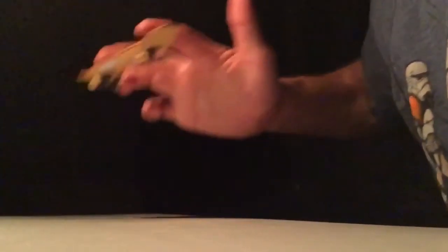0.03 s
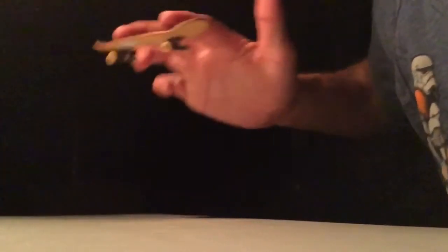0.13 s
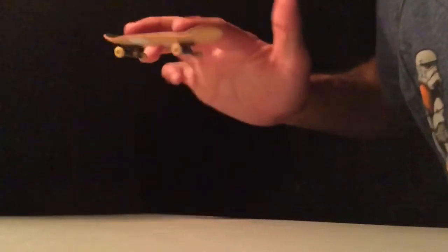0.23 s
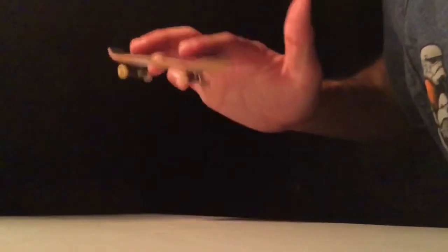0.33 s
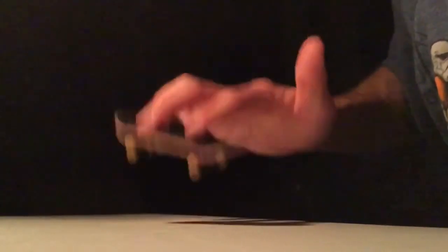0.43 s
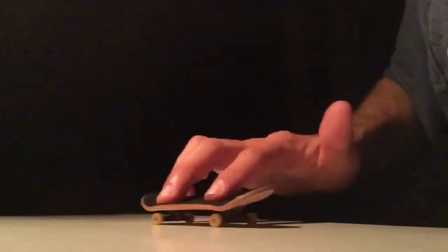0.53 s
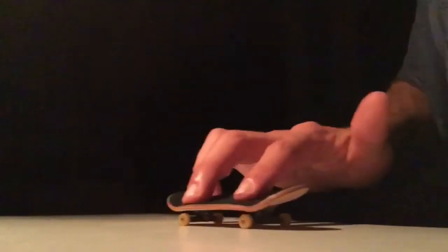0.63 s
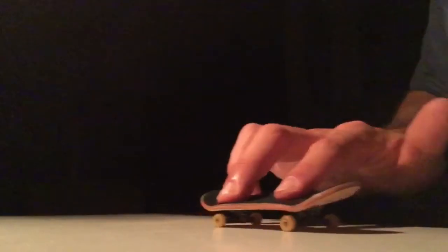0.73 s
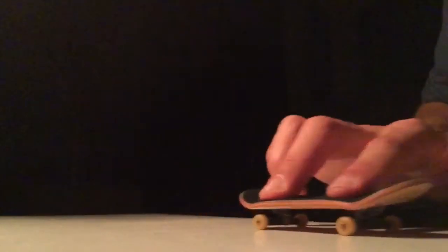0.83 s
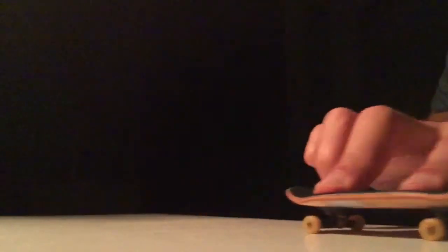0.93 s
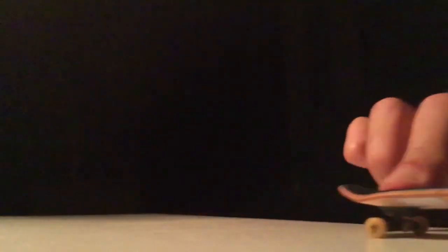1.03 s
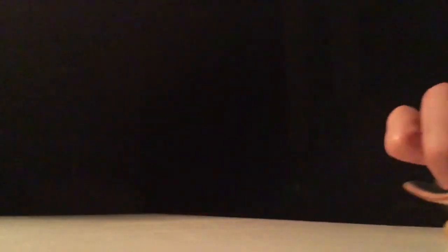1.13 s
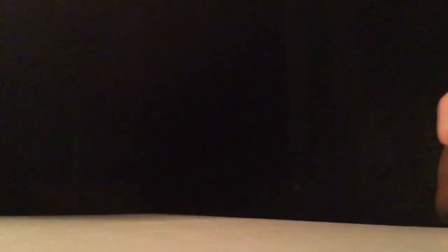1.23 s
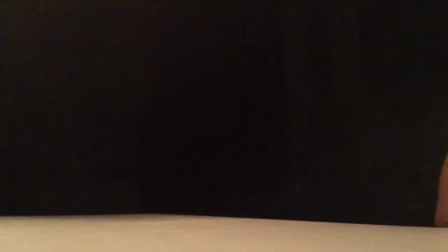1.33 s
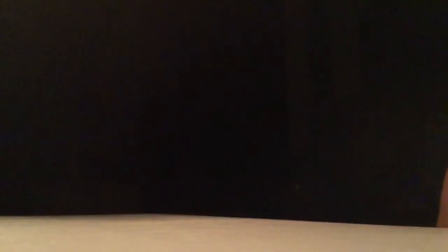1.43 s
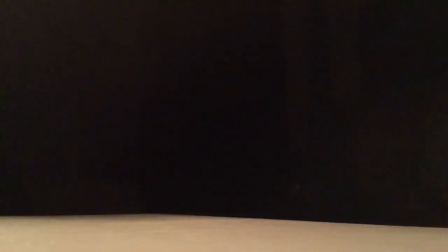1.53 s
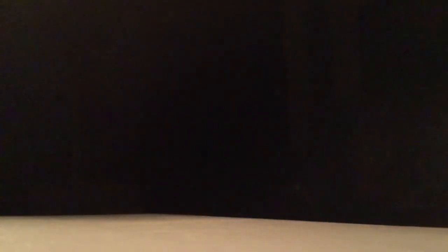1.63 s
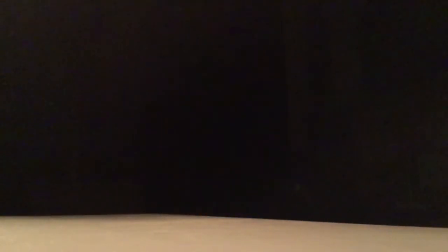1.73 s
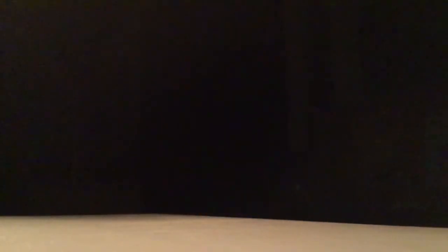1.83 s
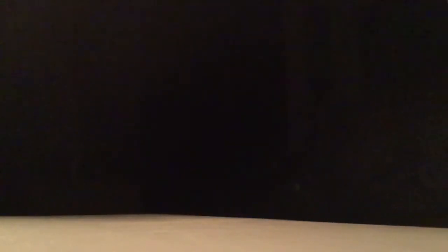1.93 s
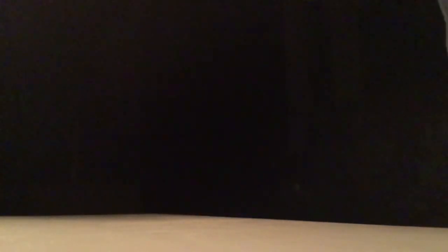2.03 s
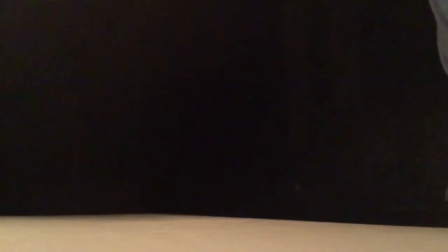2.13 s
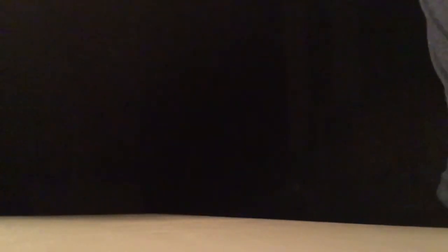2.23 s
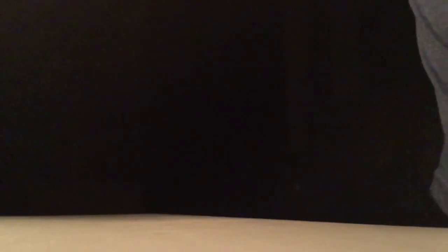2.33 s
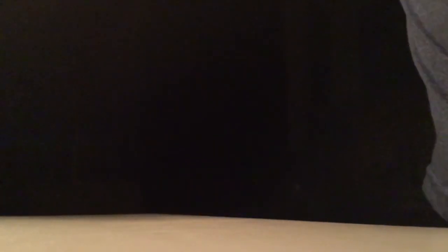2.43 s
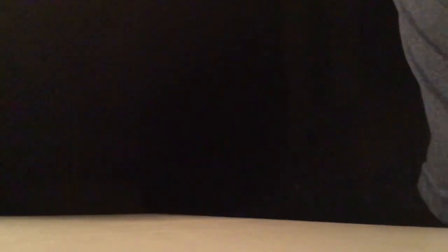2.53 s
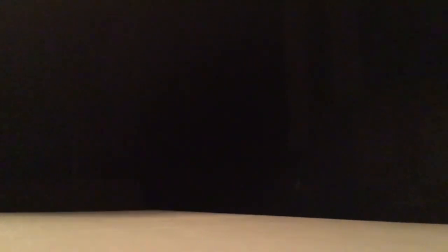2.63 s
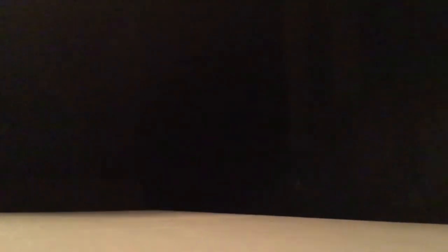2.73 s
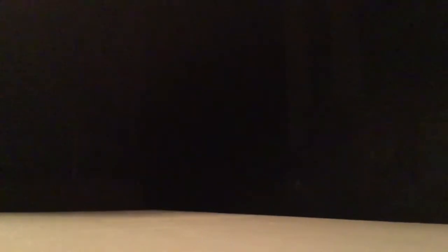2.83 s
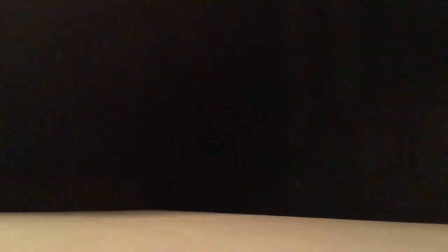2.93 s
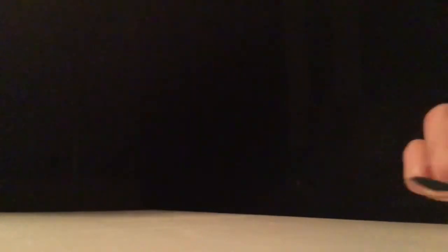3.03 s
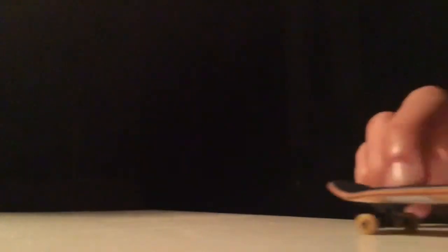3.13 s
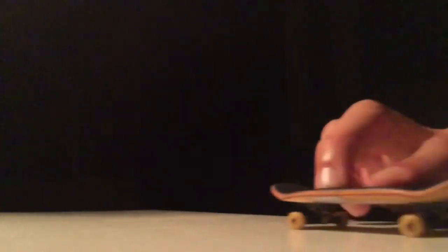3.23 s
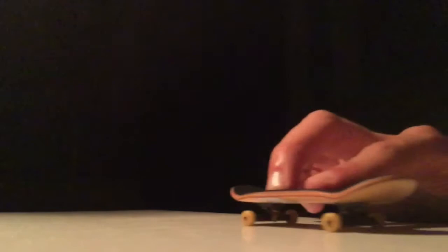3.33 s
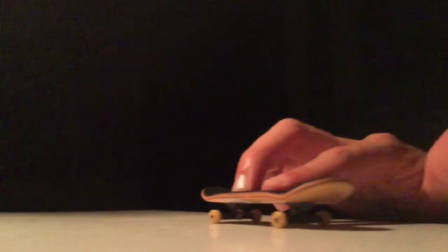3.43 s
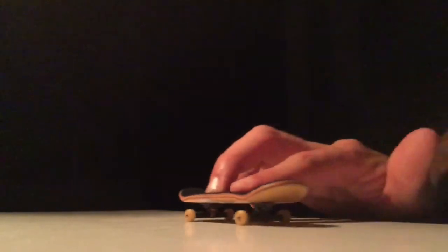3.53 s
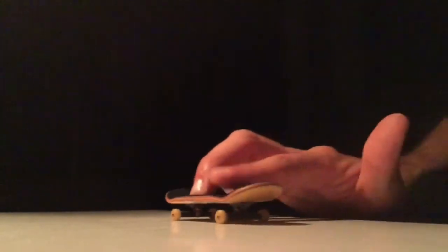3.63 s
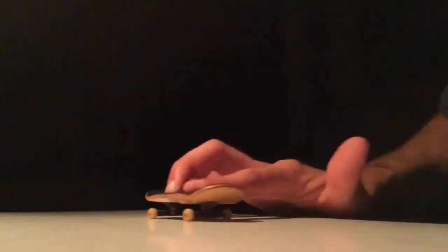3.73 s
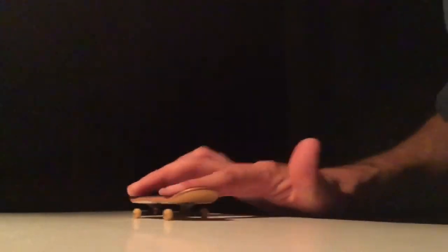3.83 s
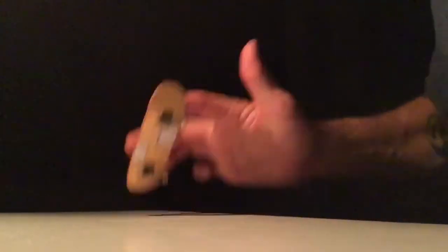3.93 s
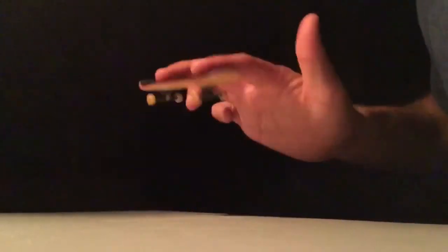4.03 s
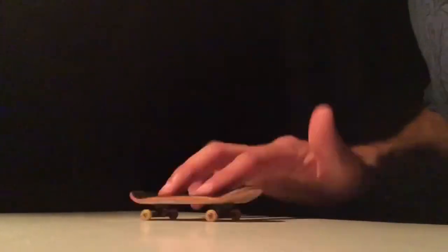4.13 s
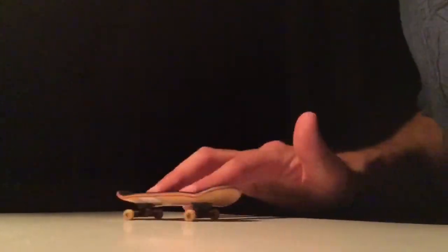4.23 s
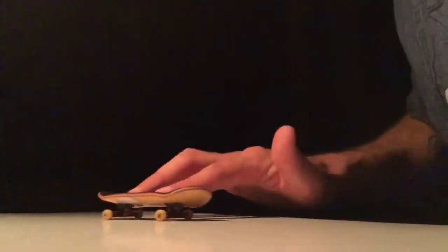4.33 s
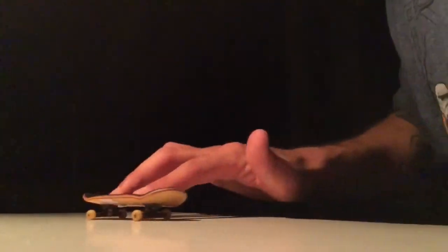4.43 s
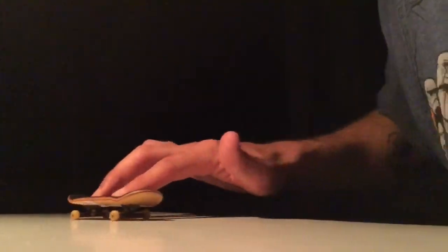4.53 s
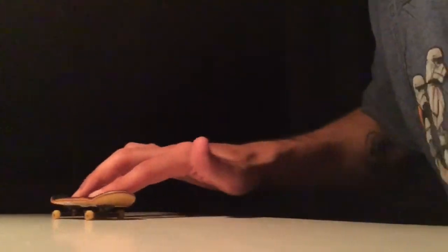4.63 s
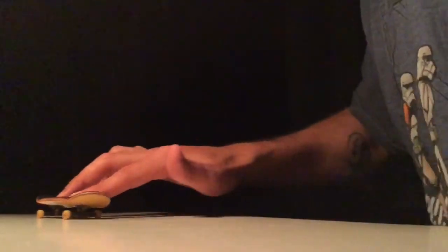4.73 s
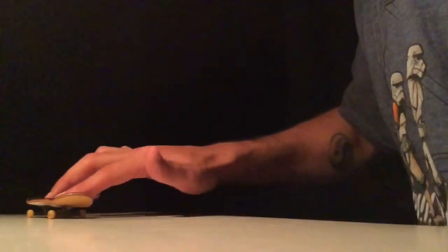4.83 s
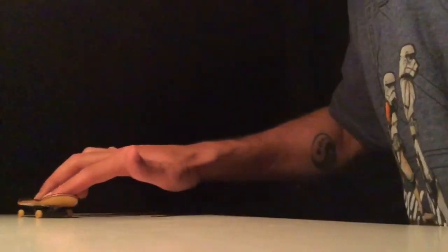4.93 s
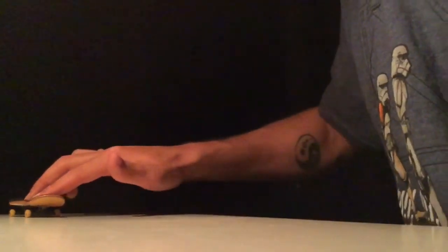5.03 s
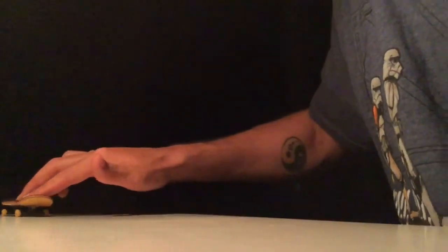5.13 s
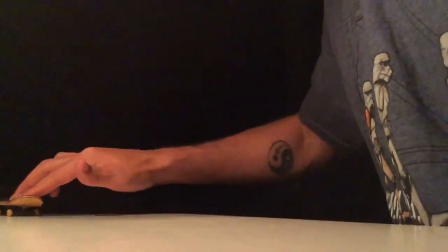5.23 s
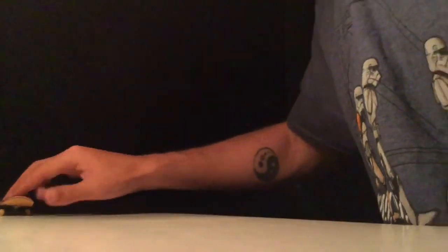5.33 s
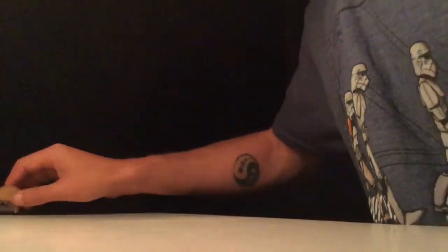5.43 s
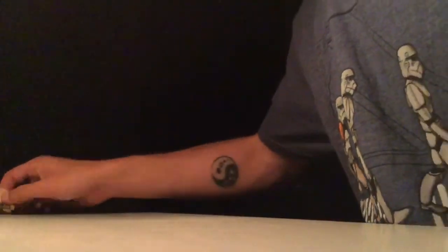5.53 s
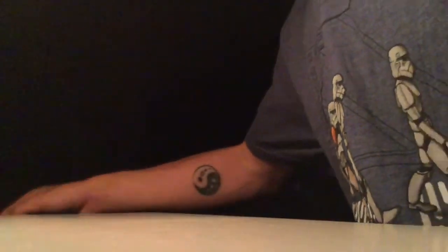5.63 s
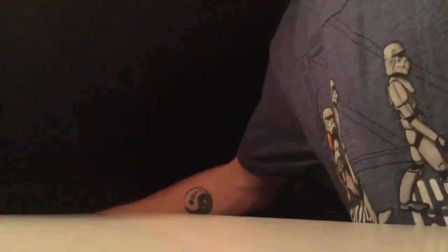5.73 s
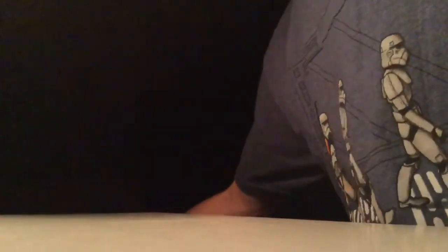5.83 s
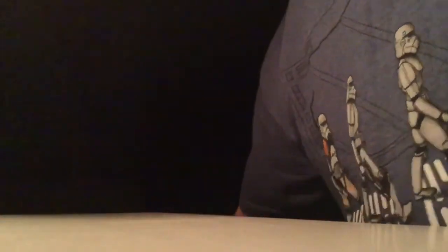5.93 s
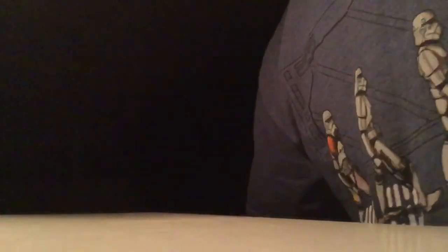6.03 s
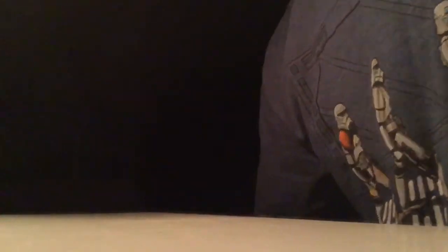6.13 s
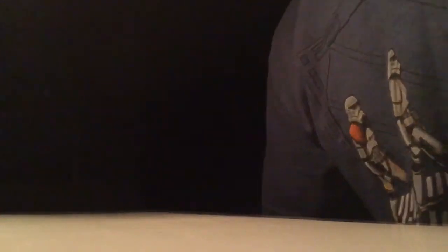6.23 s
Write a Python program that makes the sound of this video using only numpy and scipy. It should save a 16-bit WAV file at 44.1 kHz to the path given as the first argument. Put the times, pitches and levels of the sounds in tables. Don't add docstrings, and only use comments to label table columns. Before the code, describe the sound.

A toy skateboard's small wheels rumble over a tabletop close up, then the tail pops, the deck lands with a loud rattling clack, and it rolls away.

```python
import sys
import numpy as np
from scipy import signal
from scipy.fft import rfft, irfft, next_fast_len
from scipy.io import wavfile
from scipy.ndimage import uniform_filter1d, map_coordinates

SR = 44100
rng = np.random.default_rng(int(sys.argv[2]) if len(sys.argv) > 2 else 0)


def digitize_waveform(pressure):
    field = np.atleast_2d(pressure).T
    bounded = np.clip(field, -1, 1)
    quanta = np.round(bounded * 32767).astype(np.int16)
    wavfile.write(sys.argv[1], SR, quanta)


def elevation(decibels):
    levels = np.asarray(decibels, float)
    return 10 ** (levels / 20)


N = 277389


def unit(x):
    return x / np.sqrt(np.mean(x ** 2) + 1e-20)


def along(points, hz):
    f, v = np.transpose(points)
    return np.interp(np.log(hz + 1), np.log(f + 1), v)


def filtered(x, response):
    m = next_fast_len(len(x) + 4096)
    return irfft(rfft(x, m) * response(np.fft.rfftfreq(m, 1 / SR)), m)[..., :len(x)]


def resonance(f, centre, width):
    return 1j * f * width / (centre * centre - f * f + 1j * f * width)


BAND_EDGES_HZ = [500, 1850, 6700, 17000]


def bands(drive, modes, between, low_hz, damping=0):
    def body(f):
        ring = sum((-1) ** k * elevation(db) * resonance(f, centre, width + damping * centre)
                   for k, (centre, width, db) in enumerate(modes))
        return ring + elevation(along(between, f))

    def window(f, lo, hi):
        return 1 / np.sqrt((1 + (lo / (f + 1)) ** 12) * (1 + (f / hi) ** 12))

    parts = []
    for force, lo, hi in zip(drive, [low_hz] + BAND_EDGES_HZ, BAND_EDGES_HZ):
        parts.append(unit(filtered(force, lambda f: body(f) * window(f, lo, hi))))
    return parts


def patchy(n, depth_db, wide=9, long=7):
    z = signal.stft(rng.standard_normal(n + 512), nperseg=512)[2]
    field = uniform_filter1d(uniform_filter1d(rng.standard_normal(z.shape), wide, 0), long, 1)
    return unit(signal.istft(z * elevation(depth_db * unit(field)), nperseg=512)[1][:n])


# frequency in Hz, level in dB.
SLOWED_COLOUR = [(21, -35), (35, -12), (85, 2), (140, -7), (650, -23), (1200, -18.5), (4400, -55),
                 (4800, -45), (6300, -46), (6900, -41), (7300, -80), (17600, -120)]
# start in dB, first fall in dB/s, floor in dB, fall of the floor in dB/s.
ECHO_DECAY = [
    (-58, 287, -68.5, 14),
    (-70, 205, -65.5, 73),
    (-74, 139, -77.5, 5),
    (-62, 152, -79, 10),
]
WAKE_S, WAKE_DB = 0.504, [-86, -85, -96, -119]
ECHO_CUT_S, ECHO_TOP_HZ = [.6, .6, .32, .072], [4500, 7050]


def slowed_echo():
    t = np.arange(round(.56 * SR)) / SR
    drive = [patchy(len(t), depth_db=2.5)] * 4
    boom, ring, buzz, _ = bands(drive, [(2670, 430, -11)], SLOWED_COLOUR, low_hz=34.3)
    buzz = unit(filtered(buzz, lambda f: f < ECHO_TOP_HZ[0]))
    hiss = patchy(len(t), depth_db=4.5)
    hiss = unit(filtered(hiss, lambda f: (f < ECHO_TOP_HZ[1]) * f / (f + 1500) * elevation(-1.5 * f / 1000)))
    waking = np.clip((t - WAKE_S) / 0.021, 0, 1)
    out = np.zeros(N)
    for part, decay, cut, wake_db in zip([boom, ring, buzz, hiss], ECHO_DECAY, ECHO_CUT_S, WAKE_DB):
        db, fall, floor_db, floor_fall = decay
        dying = elevation(db - fall * t) + elevation(floor_db - floor_fall * t)
        out[:len(t)] += part * (dying * np.clip((cut - t) * 200, 0, 1) + elevation(wake_db) * waking)
    return out


# frequency in Hz, level in dB per Hz.
ROOM_COLOUR = [(24, -50), (40, -37.5), (124, 4), (332, 2), (437, -15.5), (527, -7), (1150, -9.5),
               (1380, -9), (2290, -37.5), (6000, -47.5), (7800, -70), (13200, -120)]


def room_tone():
    air = patchy(N, depth_db=4.0, wide=4, long=14)
    hum = unit(filtered(air, lambda f: elevation(along(ROOM_COLOUR, f)) / np.sqrt(1 + (90 / (f + 1)) ** 6)))
    return elevation(-63) * hum * (np.arange(N) > GAPS[0][0] * SR)


def bumps(n, rate, spread_db):
    size = elevation(spread_db * np.minimum(rng.exponential(size=n), 3)) * rng.standard_normal(n)
    clumps = elevation(1.4 * map_coordinates(rng.standard_normal(n // 400 + 4), [np.arange(n) / 400]))
    return unit(clumps * size * (rng.random(n) < rate / SR))


def wobble(n, rate):
    return map_coordinates(rng.standard_normal(int(n / 400) + 9), [np.arange(n) * rate / SR])


# centre in s, half length in s, lift in dB.
FINGER_SLIPS = [(0.633, 0.13, 43), (0.776, 0.016, 23.5), (0.86, 0.047, -9), (0.945, 0.13, 19),
                (1.274, 0.036, 13), (1.407, 0.19, 19.5), (1.638, 0.045, 15.5), (1.775, 0.048, 36),
                (3.033, 0.031, 19.5), (3.085, 0.033, 10), (3.265, 0.125, 22), (3.419, 0.021, 17.5),
                (3.72, 0.031, 29.5), (3.794, 0.064, 19.5), (3.849, 0.022, 30), (4.287, 0.14, 32.5),
                (4.76, 0.13, 17.5), (4.971, 0.1, 20), (5.152, 0.058, 6), (5.27, 0.025, 4), (5.4, 0.028, 30),
                (6.207, 0.02, 28)]
USUAL_DB = -43
BOOM_GROWS, BUZZ_GROWS, HISS_GROWS = 0.69, 1.06, 0.96
SLIP_BUZZ = 0.27
# depth in dB for boom, ring, buzz, hiss; lumps per second.
LUMPS_DB, LUMPS_PER_S = [0.99, 1.4, 2, 3.2], 40


def levels(rows, balance_db, t):
    force = np.interp(t, *np.transpose(rows)) - USUAL_DB
    lift = np.max([db * np.clip(1 - np.abs(t - s) / half, 0, 1) for s, half, db in FINGER_SLIPS], axis=0)
    boom, buzz, hiss = balance_db
    steady = [boom + BOOM_GROWS * force,
              USUAL_DB + force,
              buzz + BUZZ_GROWS * force + SLIP_BUZZ * lift,
              hiss + HISS_GROWS * force + lift]
    return [db + depth * wobble(len(t), LUMPS_PER_S) for db, depth in zip(steady, LUMPS_DB)]


# centre in Hz, width in Hz, level in dB.
NEAR = [(232.5, 17, -3), (672, 29, -4.5), (1015, 180, -7), (3000, 37, -36), (3740, 120, -47),
        (4560, 170, -28.5), (4650, 60, -21.5), (5040, 36, -38), (5950, 80, -45), (5880, 50, -40),
        (6700, 51, -33.5), (6910, 83, -56), (6950, 56, -33.5)]
NEAR_LATE = [(246, 41, -3), (679, 18, 2.5), (970, 19, 2.5), (1296, 58, 0.5), (2550, 660, -25),
             (2880, 37, -14.5), (3580, 38, -45), (4290, 52, -15), (5040, 67, -24.5), (5100, 80, -36),
             (6440, 240, -65), (7100, 66, -39), (7000, 31, -50), (7740, 36, -52)]
SIDE_ON = [(235, 28.3, 8), (712, 46, 2.5), (940, 39, -3.5), (1290, 35, -0.5), (2000, 53, -22),
           (2560, 150, -14), (4150, 35, -24), (5100, 100, -26.5)]
SIDE_LATE = [(234.3, 20, -4), (539, 14, -9.5), (719, 43, -3.5), (1014, 62, -4.5), (1234, 25, -10.5),
             (2400, 41, -13), (2800, 330, -16), (3500, 140, -16), (4040, 120, -18.5), (4920, 40, -25),
             (5360, 67, -51), (5860, 120, -43), (5870, 53, -46)]
FAR = [(327, 39, -1), (596, 130, -11), (974, 170, -7), (1268, 30, -0.5), (2360, 83, -21.5),
       (3310, 140, -19), (4120, 970, -46), (5170, 90, -56)]
FARTHEST = [(349, 24, 9.5), (559, 14, 0), (750, 290, -14.5), (1126, 170, -7), (2310, 140, -20),
            (2820, 84, -10.5), (3230, 82, -19.5), (4100, 92, -39), (4360, 69, -27), (5130, 150, -16),
            (7300, 500, -62)]
RETURN = [(236, 19, 8), (746, 45, 3), (1240, 120, -6.5), (2470, 120, -16), (2810, 93, -17.5),
          (3100, 57, -28.5), (3530, 60, -33.5), (3840, 15, -44), (4560, 48, -30), (4700, 56, -30.5),
          (5040, 72, -37), (6100, 83, -33.5)]
DRAG = [(238, 52, -6.5), (996, 40, -1.5), (1320, 160, -4), (1701, 65, 3.5), (2130, 83, -7), (2380, 49, -8),
        (2760, 80, -10), (3530, 80, -21.5), (4300, 250, -21)]
DRAG_LATE = [(239, 55, -5.5), (900, 73, -17), (1260, 44, 1), (1640, 110, 4), (2170, 150, -7.5),
             (2700, 200, -15), (3380, 70, -20), (3450, 28, -23), (3750, 90, -14.5), (4610, 60, -18.5)]
SCRAPE = [(229, 49, -7.5), (392, 680, -11), (758, 56, -4.5), (990, 28, 1.5), (1238, 62, -6),
          (1610, 19, -8.5), (2130, 74, -8.5), (2900, 330, -6.5), (4090, 500, -17), (4800, 250, -16.5)]
SETTLE = [(256, 47, -2), (540, 19, -19), (794, 13, -4), (1017, 77, -0.5), (1270, 41, -5), (2410, 93, -23.5),
          (2790, 65, -19.5), (3180, 100, -28), (4050, 210, -37), (4900, 86, -26)]
EDGE = [(546, 27, 1), (810, 67, 4.5), (1043, 33, -2.5), (1665, 73, -16), (2285, 170, -8), (2863, 88, -4.5)]
# frequency in Hz, level in dB.
ROUGH = [(100, -41), (170, -26), (500, -18), (1500, -14.5), (1900, -28), (4800, -29), (6500, -46.5),
         (7800, -54.5), (10000, -54), (15500, -64)]
ROUGH_FAR = [(100, -88), (200, -8.5), (450, -9), (1400, -13.5), (1900, -26), (5200, -25), (5700, -50.5),
             (8000, -37), (15500, -44)]
PLACES = [(NEAR, ROUGH), (NEAR_LATE, ROUGH), (SIDE_ON, ROUGH), (SIDE_LATE, ROUGH),
          (FAR, ROUGH_FAR), (FARTHEST, ROUGH_FAR), (RETURN, ROUGH), (DRAG, ROUGH), (DRAG_LATE, ROUGH),
          (SCRAPE, ROUGH), (SCRAPE, ROUGH), (SETTLE, ROUGH_FAR), (EDGE, ROUGH_FAR)]
# time in s, force in dB.
LONG_ROLLS = [
    [(.592, -35.5), (.66, -55.5), (.76, -46), (.81, -47.5), (.87, -43.5), (1.0, -43), (1.12, -47)],
    [(1.12, -37.5), (1.2, -42.5), (1.29, -39.5), (1.45, -43.5), (1.55, -44.5), (1.62, -48)],
    [(2.665, -73), (2.68, -61), (2.8, -53.5), (2.9, -43.5), (3.05, -41.5), (3.2, -37)],
    [(3.2, -42), (3.35, -40), (3.5, -43.5), (3.625, -44.5), (3.655, -51.5), (3.7, -64)],
]
# time in s, force in dB.
SHORT_RUNS = [
    [(4.56, -51.5), (4.696, -38), (4.8, -41), (5.0, -47)],
    [(5.0, -47), (5.208, -45.5), (5.3, -53.5)],
    [(6.0, -78), (6.014, -61.5), (6.12, -55), (6.2, -47.5), (6.285, -40)],
    [(1.612, -47), (1.645, -43), (1.685, -42.5)],
    [(1.685, -44.5), (1.758, -48), (1.763, -52)],
    [(3.7, -60), (3.755, -41), (3.785, -33), (3.81, -36.5), (3.838, -32), (3.85, -42), (3.875, -44)],
    [(3.875, -48.5), (3.9, -39.5), (3.925, -27), (3.945, -19.5), (3.975, -34.5)],
    [(4.3, -54), (4.428, -46), (4.47, -46.5), (4.51, -51.5), (4.56, -43)],
    [(5.3, -42), (5.34, -42.5), (5.47, -37)],
]
# boom in dB, buzz in dB, hiss in dB.
RUN_BALANCE = [(-38.5, -56, -89.5), (-44, -56.5, -89.5), (-44.5, -53, -80), (-41.5, -53.5, -85),
               (-42, -59, -113), (-41, -52.5, -88), (-42, -54, -74), (-66.5, -48, -72), (-78.5, -45, -83),
               (-41, -57, -83.5), (-44, -52.5, -67.5), (-41, -61, -91.5), (-49, -54, -81.5)]
JOINS_S, BLEND_S = np.array([1.12, 1.685, 3.2, 4.56, 5.0, 5.3]), .07


def rolling():
    def joined(s):
        return np.abs(JOINS_S - s).min() < .04

    def blend(u):
        return np.sqrt(np.clip(.5 + .5 * u / BLEND_S, 0, 1))

    out = np.zeros(N + SR)
    for rows, (modes, between), balance_db in zip(LONG_ROLLS + SHORT_RUNS, PLACES, RUN_BALANCE):
        first, last = rows[0][0], rows[-1][0]
        start = round((first - .1) * SR)
        t = np.arange(start, round((last + .1) * SR)) / SR
        bump = bumps(len(t), rate=1000, spread_db=2.5)
        grain = patchy(len(t), depth_db=2.2, wide=3, long=16)
        rattle = patchy(len(t), depth_db=4.0, wide=12, long=16)
        hiss = patchy(len(t), depth_db=6.5, wide=9, long=12)
        drive = [grain + 0.19 * bump, grain + 0.97 * bump, rattle + 0.5 * bump, hiss + 0.1 * bump]
        parts = bands(drive, modes, between, low_hz=140, damping=0.014)
        rise = blend(t - first) if joined(first) else np.clip((t - first) / 0.021 + 1, 0, 1)
        fall = blend(last - t) if joined(last) else elevation(-1300 * np.clip(t - last, 0, 1))
        roll = sum(elevation(db) * part for db, part in zip(levels(rows, balance_db, t), parts))
        out[start:][:len(t)] += rise * fall * roll
    return out[:N]


# start in s, length in s, level in dB, first pitch in Hz, last pitch in Hz.
WHINE_EVENTS = [
    (0.782, 0.31, -78, 7160, 6600),
    (1.24, 0.27, -67, 5950, 7370),
    (1.627, 0.083, -66, 2900, 2310),
    (1.629, 0.14, -54, 4370, 3500),
    (1.683, 0.071, -52, 3500, 3050),
    (2.823, 0.17, -68, 5580, 6300),
    (3.477, .18, -75, 6250, 6400),
    (5.026, .2, -70.5, 4730, 5400),
    (5.676, 0.16, -66, 581, 495),
]


def whine():
    out = np.zeros(N + SR)
    for s, length, db, first_hz, last_hz in WHINE_EVENTS:
        t = np.arange(round(length * SR)) / SR
        turn = 2 * np.pi * np.cumsum(first_hz + (last_hz - first_hz) * t / length) / SR
        half_width = 0.025 * first_hz
        slow = [filtered(patchy(len(t), depth_db=2.5), lambda f: 1 / (1 + (f / half_width) ** 2))
                for _ in range(2)]
        band = unit(slow[0] * np.cos(turn) + slow[1] * np.sin(turn))
        out[round(s * SR):][:len(t)] += elevation(db) * np.sin(np.pi * t / length) * band
    return out[:N]


def ticks(events, t60, width, broad, order=2):
    out, t = np.zeros(N + SR), np.arange(SR // 20) / SR
    for s, db, hz in events:
        burst = elevation(-60 * t / t60) * rng.standard_normal(len(t))
        tick = filtered(burst, lambda f: resonance(f, hz, hz * width) ** order + broad * (f / (f + hz)) ** 2)
        out[round(s * SR):][:len(t)] += elevation(db) * tick / np.abs(tick).max()
    return out[:N]


# start in s, peak in dB, pitch in Hz.
GRIT_SPECKS = [(0.8321, -47, 4970), (0.9129, -58, 4460), (1.1734, -39.5, 4340), (1.626, -34.5, 4770),
               (1.625, -30, 2400), (4.529, -48.5, 2800), (3.913, -29, 3050), (1.7605, -46, 9220),
               (3.1565, -44.5, 4200), (3.1819, -49, 6490), (3.2207, -46.5, 4040), (3.2584, -28, 4050),
               (3.284, -36, 3800), (3.35, -46, 9500), (3.7069, -67, 14800), (3.7759, -42, 15300),
               (3.7867, -37.5, 5400), (3.7939, -52, 4080), (3.8997, -39, 9000), (3.9, -38, 12000),
               (3.9255, -38, 10500), (3.9264, -32.5, 4700), (3.9434, -24.5, 2400), (3.9585, -38, 11000),
               (3.8316, -34.5, 2790), (3.7807, -31.5, 2400), (3.9319, -29.5, 2770), (3.9819, -43.5, 12600),
               (3.9856, -35.5, 11420), (4.434, -41.5, 5370), (4.4345, -42.5, 2605), (4.4857, -51, 5040),
               (4.9529, -44.5, 4560), (4.9925, -45.5, 4700), (5.1045, -50, 7500), (5.2623, -49, 10550),
               (5.3924, -39, 4600)]
# start in s, peak in dB, pitch in Hz.
TABLE_SEAMS = [(1.175, -22.5, 1310), (1.464, -24.5, 857), (2.885, -54, 724), (2.912, -27, 1260),
               (3.257, -25.5, 850), (3.393, -24, 725), (3.716, -38, 818), (4.435, -24.5, 1000),
               (4.495, -34, 900), (4.53, -25.5, 960), (4.601, -24, 960), (4.673, -22, 900),
               (6.247, -26.5, 680)]


def grit():
    specks = ticks(GRIT_SPECKS, t60=0.0079, width=0.32, broad=.05)
    seams = ticks(TABLE_SEAMS, t60=0.012, width=0.6, broad=0, order=3)
    return specks + elevation(-4.5) * seams


# start in s, length in s, level in dB, first pitch in Hz,
# settled pitch in Hz, overtones in dB.
HOUSE_TONES = [
    (1.407, .36, -77, 55, 54.5, -27),
    (2.272, .04, -87, 2780, 2780, -40),
    (2.271, 0.03, -88, 2550, 2550, -40),
]


def house():
    out = np.zeros(N)
    for s, length, db, first_hz, settled_hz, over_db in HOUSE_TONES:
        t = np.arange(round(length * SR)) / SR
        turn = 2 * np.pi * np.cumsum(settled_hz + (first_hz - settled_hz) * np.exp(-t / 0.09)) / SR
        tone = np.sin(turn) + elevation(over_db) * (np.sin(2 * turn) + np.sin(3 * turn))
        swell = np.sqrt(np.abs(np.sin(np.pi * t / length)))
        out[round(s * SR):][:len(t)] += elevation(db + 3) * swell * tone
    return out


# start in s, peak in dB, boom in dB, ring in dB, top in dB.
CLACKS = [
    (1.781, -13.5, -19.5, -8.5, -12),
    (3.9923, -1.5, -13.5, -18.5, -9),
    (4.2047, -2.5, -22, -16, -6.5),
    (5.4795, -16, -13.5, 1.5, -7.5),
    (5.5204, -5.5, -13.5, -4.5, -13.5),
    (5.603, -26.5, -21.5, -9.5, -11),
    (5.8286, -47, -26, -7.5, 4.5),
]
# blow t60 in s, tail in dB, tail t60 in s, lag of the table in s.
CLACK_DECAY = [(0.0049, -22, 0.071, 0.00067), (0.0045, -29.5, 0.14, 0.00042), (0.0079, -14, 0.12, 0.00067),
               (0.0075, -17, 0.078, 0.00067), (0.0087, -20.5, 0.13, 0.00061), (0.02, -14, 0.068, 0.00085),
               (0.023, -11, 0.11, 0.0018)]
# centre in Hz, width in Hz, level in dB.
TAP = [(231, 16, 4.5), (400, 43, -2), (680, 17, -10), (900, 100, -6), (1670, 43, 1.5), (2120, 78, -1.5),
       (3200, 110, 2), (3970, 330, -5.5), (4760, 220, -6), (5600, 260, -23.5), (8530, 200, -27.5)]
POP = [(322, 110, -4.5), (1480, 830, -8), (3500, 220, -14.5), (5260, 560, -8), (9200, 430, -12),
       (11200, 620, -7.5), (13500, 2200, -17)]
LANDING = [(235, 44, -7.5), (325, 50, -8), (377, 110, 2), (820, 210, 4.5), (1268, 95, 7),
           (1764, 220, -15.5), (2010, 180, -20), (3030, 240, -7), (3897, 460, -11), (5560, 630, -11.5),
           (8600, 380, -24.5)]
NUDGE = [(246, 22, -2), (543, 38, -0.5), (730, 170, -3), (1057, 260, 0), (1490, 116, -9), (2026, 250, -5),
         (2900, 140, -11.5), (3380, 250, -14.5), (4300, 290, -16), (5260, 700, -15.5), (9500, 402, -36.5)]
KNOCK = [(232, 15, -4), (538, 27, -5.5), (820, 210, -9.5), (1100, 66, -10.5), (1221, 110, -8.5),
         (1500, 150, -13), (1810, 230, -8), (2160, 300, -7.5), (2900, 81, -19), (3590, 150, -11.5),
         (4630, 291, -23), (5400, 350, -8.5), (6004, 430, -14.5), (8920, 160, -19.5)]
BOUNCE = [(302, 107.5, -14), (1310, 620, -4), (2530, 830, -5), (5400, 770, -17), (12790, 3200, -17)]
BRUSH = [(1700, 400, -25), (2800, 150, -6.5), (4050, 250, -1.5), (4850, 240, -0.5), (6860, 560, -4.5),
         (8820, 1400, -6), (13860, 2100, -5.5)]
STRUCK = [TAP, POP, LANDING, NUDGE, KNOCK, BOUNCE, BRUSH]
CHATTER_MS = 2.42
CHATTER_DB = [4, 6, 3.5, 4.5, -2.5, -9, -10, -18]
# delay in ms, level in dB.
CONTACTS = [
    [(0, -1.5), (1.6, 3), (4.5, -17.5)],
    [(0, -18.5), (.9, -1), (2.3, -11)],
    [(1.6 + k * CHATTER_MS, db) for k, db in enumerate(CHATTER_DB)] + [(26, -7)],
    [(.9, -9.5), (2.2, 5), (6.3, -10)],
    [(1.7, -1), (2.65, -1.5), (5.5, -5.5), (6.5, -6.5), (10, -18.5)],
    [(0, -5), (2.2, -1)],
    [(0, 5), (6, -11)],
]
CRISP_DB = [12, 15, 22, 5.1, 14, 6.7, 2.7]
# frequency in Hz, level in dB.
CRACK = [(100, -25.5), (300, -21), (550, -27.5), (1500, -14.5), (3000, -24.5), (5000, -22), (10000, -22.5),
         (16000, -26)]
TAIL_TILT_DB = [15, 7.5, -2, -6.5]
LATE_DB, LATE_T60 = -23.5, 0.22


def clacks():
    out, t = np.zeros(N + SR), np.arange(SR // 3) / SR
    sharp = np.array([[1], [1], [.7], [.4]])
    for clack, decay, modes, contacts, crisp_db in zip(CLACKS, CLACK_DECAY, STRUCK, CONTACTS, CRISP_DB):
        s, db, boom_db, ring_db, top_db = clack
        blow, tail_db, tail, lag = decay
        force, blows = np.zeros(len(t)), np.zeros(len(t))
        for ms, g in contacts:
            force += elevation(g - 60 * np.abs(t - ms / 1000) / blow) * (t >= ms / 1000)
            blows[round(ms * SR / 1000)] = elevation(g + crisp_db)
        slow = signal.lfilter([1], [1, -np.exp(-1 / (lag * SR + 1))], force)
        slow *= force.max() / slow.max()
        noise = rng.standard_normal((2, len(t)))
        drive = noise[0] * [slow, slow, force, force] + sharp * blows
        direct = bands(drive, modes, CRACK, low_hz=170, damping=0.018)
        walls = bands([noise[1]] * 4, modes, CRACK, low_hz=185, damping=.1)
        dying = elevation(tail_db) * (elevation(-60 * t / tail) + elevation(LATE_DB - 60 * t / LATE_T60))
        dying *= 1 - np.exp(-t / 0.0014)
        knock = np.zeros(len(t))
        for g, tilt, hit, wall in zip([boom_db, ring_db, 0, top_db + 3.5], TAIL_TILT_DB, direct, walls):
            knock += elevation(g) * (hit / np.abs(hit).max() + elevation(tilt) * dying * wall)
        out[round(s * SR):][:len(t)] += elevation(db - 0.5) * knock * (1 - np.exp(-t / 0.00013))
    return signal.lfilter(*signal.butter(2, 70, "high", fs=SR), out[:N])


def since_landing():
    return np.clip(np.arange(N) / SR - CLACKS[2][0], 0, None)


def thump():
    u = since_landing() / 0.0012
    return elevation(-16) * np.e * u * (1 - u / 2) * np.exp(-u)


# pitch in Hz, level in dB, swell in ms, t60 in s.
LANDING_NOTES = [
    (232, -14.5, 15, 0.057),
    (328, -10, 8.9, 0.067),
    (400, -16.5, 14, 0.028),
    (833, -10, 7, 0.04),
    (1234, -6.5, 10, 0.021),
]
IN_STEP_S = 4.2149


def landing_ring():
    t = since_landing()
    turn = 2 * np.pi * (np.arange(N) / SR - IN_STEP_S)
    out = np.zeros(N)
    for hz, db, ms, t60 in LANDING_NOTES:
        swell = np.clip(1000 * t / ms, 0, 1) ** 1.5
        dying = elevation(db - 60 * np.clip(t - ms / 1000, 0, None) / t60)
        out -= dying * swell * np.cos(hz * turn)
    return out


# start in s, level in dB, pitch in Hz, t60 in s.
DECK_NOTES = [
    (5.4808, -6.5, 2107, .018),
    (5.5218, -2, 2130, 0.018),
    (5.5256, -13, 2096, 0.019),
]


def deck_sings():
    out = np.zeros(N)
    for s, db, hz, t60 in DECK_NOTES:
        t = np.clip(np.arange(N) / SR - s, 0, None)
        out += elevation(db - 60 * t / t60) * (1 - np.exp(-t / 0.00088)) * np.sin(2 * np.pi * hz * t)
    return out


def scene():
    board = rolling() + whine() + grit()
    blows = clacks() + thump() + landing_ring() + deck_sings()
    return (slowed_echo() + room_tone() + board + house() + blows)[None]


GATE_DB, DUCK_DB, GATE_FROM_HZ = -110, -4, 3700


def gate(x):
    hz, _, z = signal.stft(x, SR, nperseg=1024)
    power = uniform_filter1d(uniform_filter1d(np.abs(z) ** 2, size=14, axis=1), size=3, axis=2)
    opened = 1 / (1 + (elevation(GATE_DB) ** 2 / (np.abs(power) + 1e-20)) ** 3)
    gain = np.where(hz[:, None] > GATE_FROM_HZ, elevation(DUCK_DB) + (1 - elevation(DUCK_DB)) * opened, 1)
    return signal.istft(z * gain, SR, nperseg=1024)[1][:, :N]


def low_pass(x):
    return signal.sosfilt(signal.butter(12, 17020, fs=SR, output="sos"), x)


# start in s, end in s.
GAPS = [
    (.553, .5922),
    (.5968, .6038),
    (.6106, .6155),
    (.6244, .627),
    (2.653, 2.665),
]
# time in s, level in dB.
SPLICE_CLICKS = [
    (0.6109, -18),
    (0.624, -22),
    (.638, -19),
]


def record(dry):
    wet = gate(dry / (1 + np.abs(dry) ** 6) ** (1 / 6))
    for start, end in GAPS:
        wet[:, round(start * SR):round(end * SR)] = 0
    for s, db in SPLICE_CLICKS:
        wet[:, round(s * SR)] += elevation(db)
    return low_pass(wet)


dry = scene()
out = record(dry)
digitize_waveform(out)
```